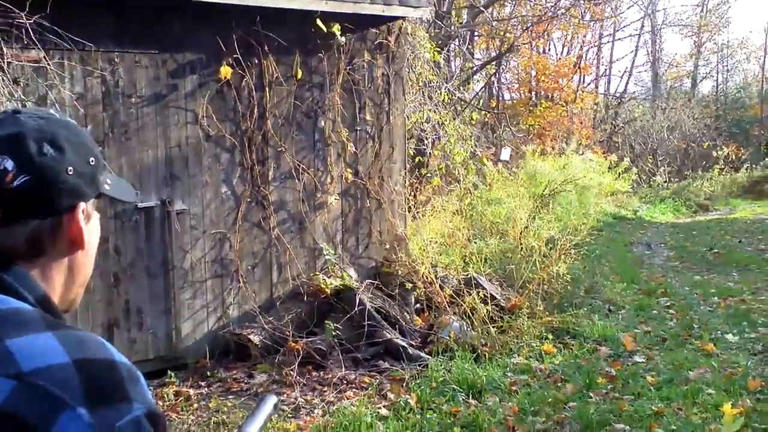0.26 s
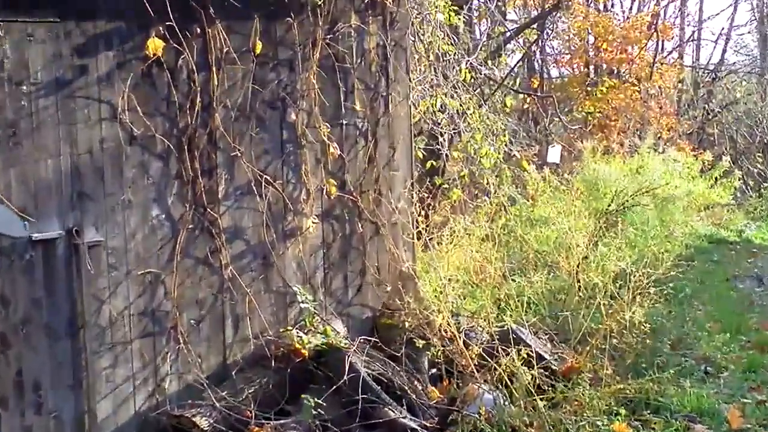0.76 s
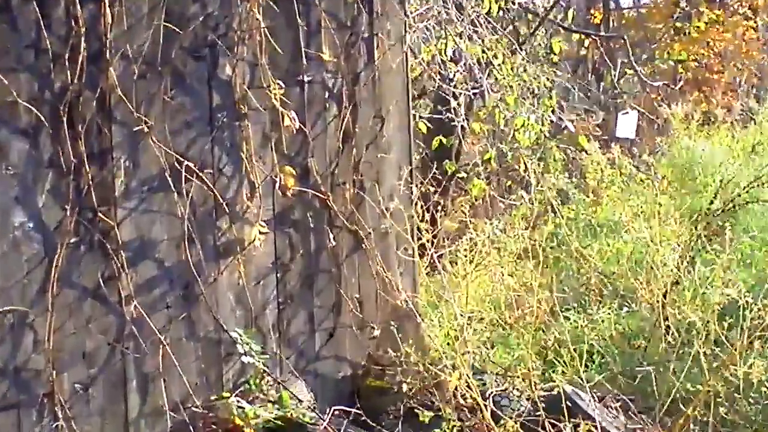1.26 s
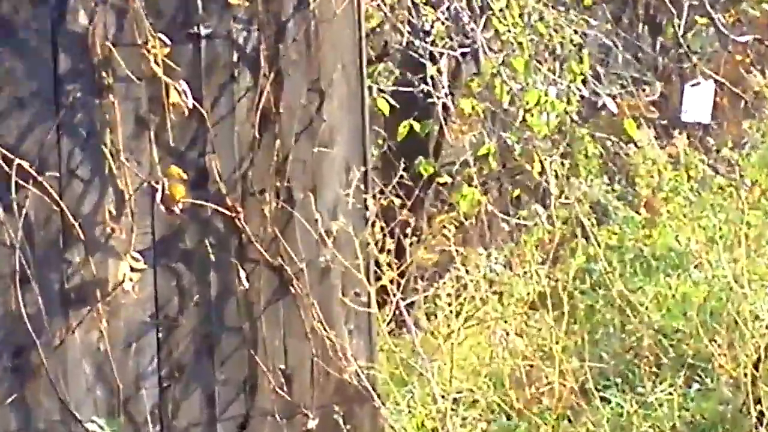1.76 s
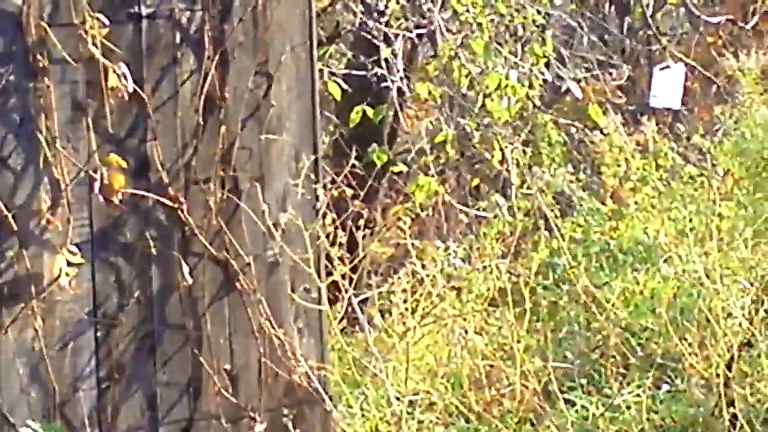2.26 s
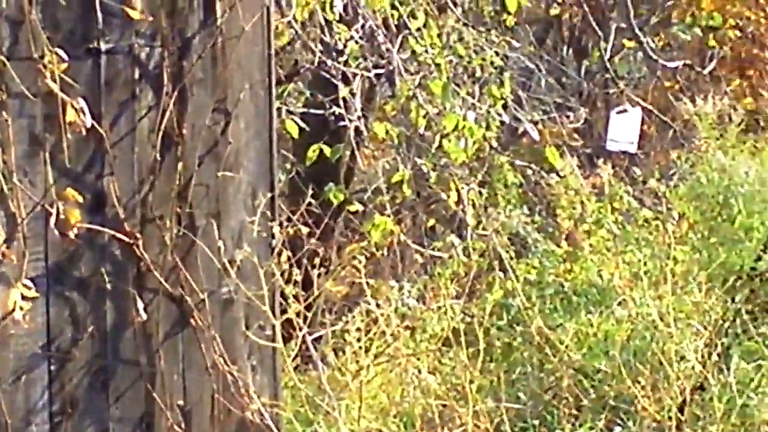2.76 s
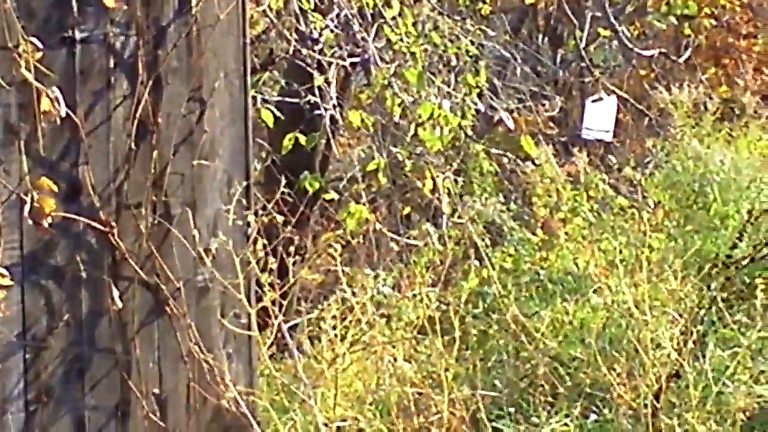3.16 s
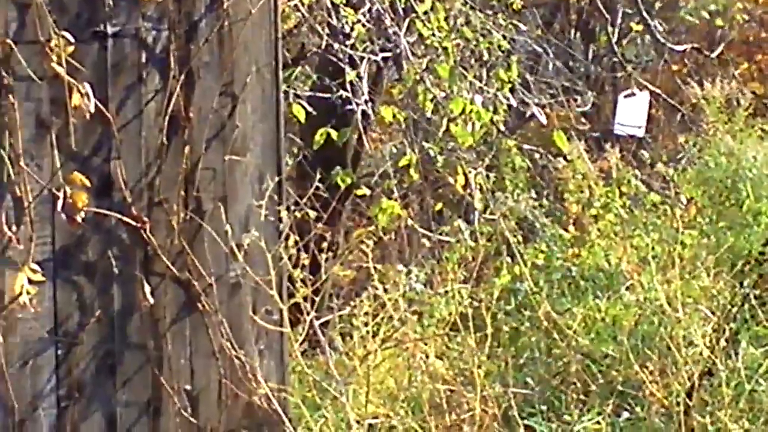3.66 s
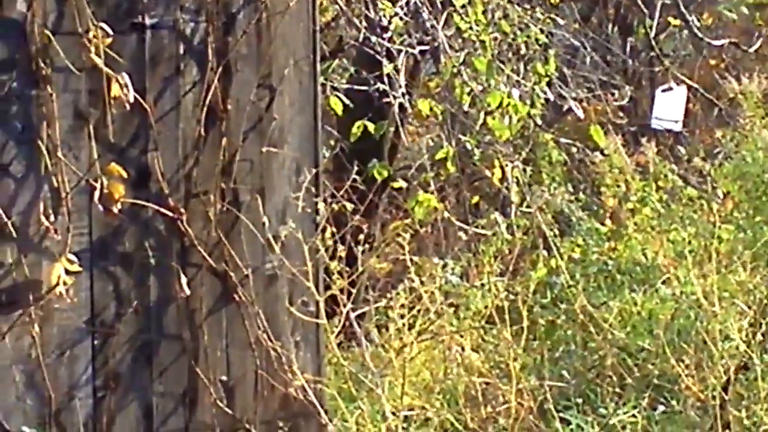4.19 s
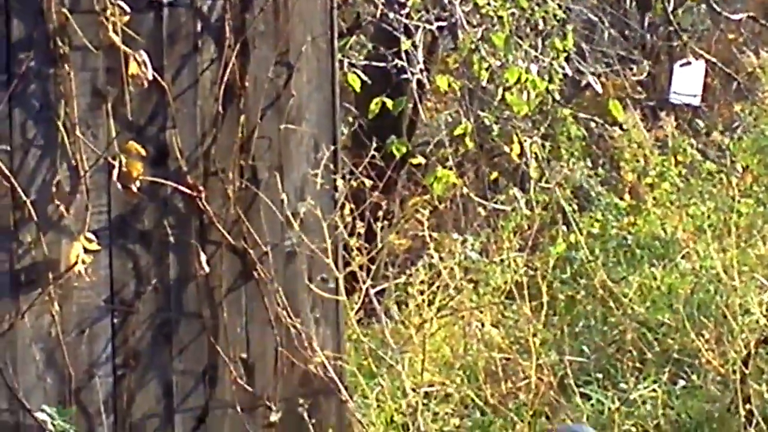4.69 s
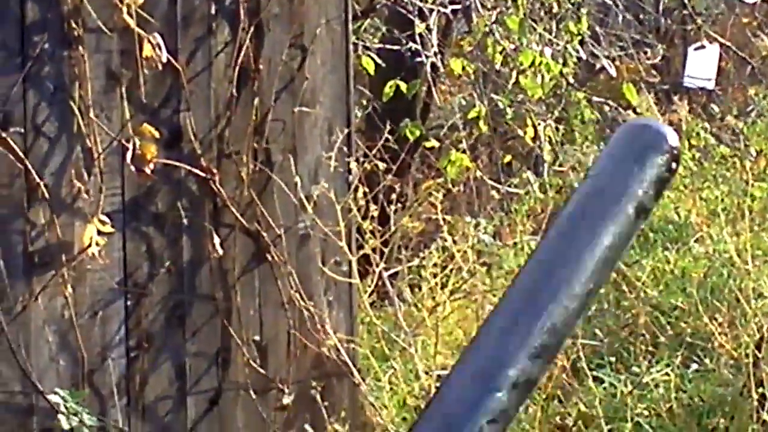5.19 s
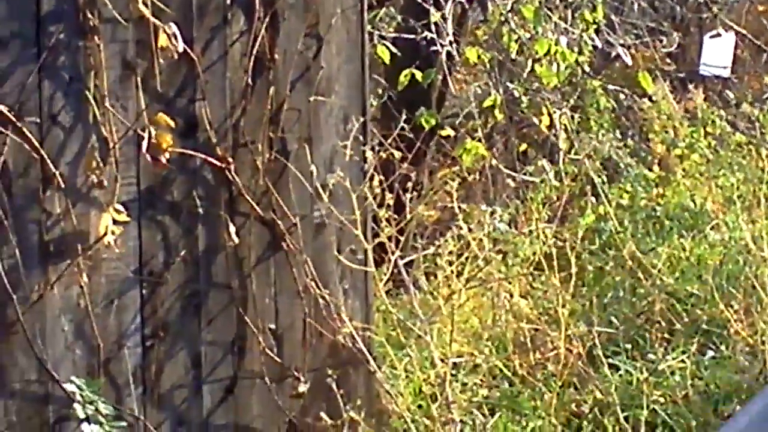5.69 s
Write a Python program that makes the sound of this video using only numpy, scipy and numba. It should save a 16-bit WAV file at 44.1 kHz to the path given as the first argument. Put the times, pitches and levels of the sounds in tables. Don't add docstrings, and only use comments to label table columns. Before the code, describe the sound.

A homemade cannon clicks and fires once beside a wooden shed; the boom returns from the woods, twigs snap, then sleeves rustle and plastic clicks.

```python
import sys
import numpy as np
from scipy import signal
from scipy.fft import rfft, irfft, next_fast_len
from scipy.io import wavfile
from scipy.ndimage import uniform_filter1d
from numba import njit

SR = 44100
rng = np.random.default_rng(int(sys.argv[2]) if len(sys.argv) > 2 else 0)


def invert_db(level):
    return 10 ** (np.asarray(level, dtype=float) / 20)


def generate_wav(signal):
    frames = np.transpose(np.atleast_2d(signal))
    scaled = np.clip(frames, -1, 1) * 32767
    pcm = np.round(scaled).astype(np.int16)
    wavfile.write(sys.argv[1], SR, pcm)


N = 261954
T = np.arange(N) / SR
SHORT = T[:SR // 4]
FAST = next_fast_len(N)
BANDS_HZ = 25 * 2 ** np.arange(0, 9.4, 1 / 3)
PLUG_EXIT_S, SUCK_BACK_S, BURST_S = 3.0608, 3.0604, 3.0638


def unit(x):
    return x / np.sqrt(np.mean(x ** 2))


@njit
def svf(x, hz, width):
    y, b, l = np.empty(len(x)), 0., 0.
    for i in range(len(x)):
        g, k = np.tan(np.pi * hz[i] / SR), width / hz[i]
        v = (b + g * (x[i] - l)) / (1 + g * (g + k))
        b, l, y[i] = 2 * v - b, l + 2 * g * v, k * v
    return y


def band(x, hz, width_hz):
    centre = np.full(len(x), 1. * hz)
    return svf(svf(x, centre, 1. * width_hz), centre, 1. * width_hz)


def dull(x, hz):
    return signal.sosfilt(signal.butter(3, hz, fs=SR, output="sos"), x)


def walk(rate):
    hold = int(SR / rate)
    steps = np.repeat(rng.standard_normal(N // hold + 1), hold)
    return 1.3 * uniform_filter1d(uniform_filter1d(steps, hold), hold)[:N]


def split(x, colour):
    hz, db = np.transpose(colour)
    octave = np.log2(np.maximum(np.fft.rfftfreq(FAST, 1 / SR), 1))
    gain_db = np.interp(octave, np.log2(hz), db, left=-80, right=-80)
    spectrum = rfft(x, FAST) * invert_db(gain_db)
    spectrum = spectrum / np.sqrt(np.mean(irfft(spectrum, FAST) ** 2))
    bands = []
    for centre_hz in BANDS_HZ:
        share = np.maximum(1 - 3 * np.abs(octave - np.log2(centre_hz)), 0)
        bands.append(irfft(spectrum * share, FAST)[:N])
    return bands


def grains(per_s, scatter_db):
    hit, size, sign = rng.random((3, N))
    click = invert_db(-scatter_db * np.log(size + .01)) * np.sign(sign - .5)
    return unit((hit < per_s / SR) * click)


def fade(t60):
    return np.exp(-np.log(1000) * SHORT / max(t60, .003))


def ring(hz, db, t60):
    return invert_db(db) * np.sin(2 * np.pi * hz * SHORT) * fade(t60)


def swell(start_s, hold_s, db, rise_db_per_s, fall_db_per_s):
    before_s = np.maximum(start_s - T, 0)
    after_s = np.maximum(T - start_s - hold_s, 0)
    return invert_db(db - rise_db_per_s * before_s - fall_db_per_s * after_s)


def add(out, at_s, sound):
    i = int(at_s * SR)
    out[i:i + len(sound)] += sound[:N - i]


def rustle(strokes, per_s, scatter_db, width_hz, gain_db, rise_db_per_s, fall_db_per_s, top_hz):
    scratch = dull(band(grains(per_s, scatter_db), 4500, 9000), top_hz)
    out = 0
    for start_s, hold_s, db, hz in strokes:
        body = .5 * scratch + svf(scratch, np.full(N, 1. * hz), 1. * width_hz)
        out = out + unit(body) * swell(start_s, hold_s, db + gain_db, rise_db_per_s, fall_db_per_s)
    return out


def tap(out, at_s, db, low_hz, high_hz, thump_db, t60, crack):
    blow = .14 * rng.standard_normal(len(SHORT)) * fade(t60) + (SHORT == 0)
    snap = band(blow, np.sqrt(low_hz * high_hz), 1.0 * abs(high_hz - low_hz))
    snap = dull(snap + crack * band(blow, 3600, 11000), 9900)
    thump_hz = 488 * (1.75 if low_hz > 2800 else 1)
    thump = ring(thump_hz, db + thump_db, 1.45 * t60)
    add(out, at_s, invert_db(db) * snap / np.abs(snap).max() + thump)


# f/Hz, level/dB
FIELD_COLOUR = [(12, -45), (20, -18.5), (92, -4.5), (140, -3.5), (297, -2.5), (808, -8.5), (904, -8.5),
                (1160, -10), (1620, -11), (2910, -15), (5820, -20), (7910, -26.5), (11400, -28.5),
                (13800, -39), (15400, -27.5)]


def field():
    recovery_s = np.maximum(T - BURST_S - .15, 0)
    duck_db = np.minimum(-14 + 24 * recovery_s, 0.3) * (T > PLUG_EXIT_S)
    bands = split(rng.standard_normal(N), FIELD_COLOUR)
    level_db = -52 + .2 * walk(1.5) + duck_db
    return sum(b * invert_db(level_db + 1.0 * walk(11)) for b in bands)


# start t/s, hold t/s, level/dB, brightness f/Hz
SLEEVE_STROKES = [
    (4.55, 0.11, -59.5, 3280),
    (4.735, 0.048, -51.5, 4500),
    (5.31, .1, -57, 2880),
    (5.85, .09, -66.5, 2950),
]


def sleeves():
    return rustle(SLEEVE_STROKES, per_s=6600, scatter_db=2.0, width_hz=3400, gain_db=3.0,
                  rise_db_per_s=222, fall_db_per_s=500, top_hz=10500)


# start t/s, hold t/s, level/dB, brightness f/Hz
HAND_STROKES = [
    (5.645, 0.047, -51, 2260),
    (5.7, 0.039, -56, 2590),
    (5.75, 0.03, -52, 2460),
    (5.79, 0.023, -62, 3500),
]


def hand_slide():
    return rustle(HAND_STROKES, per_s=3000, scatter_db=2.0, width_hz=900, gain_db=2.5,
                  rise_db_per_s=1200, fall_db_per_s=600, top_hz=7500)


# t/s, peak level/dB, lowest f/Hz, highest f/Hz,
# thump level/dB
HARD_TICKS = [(.24, -27, 2000, 3900, -10), (.2887, -29, 2110, 3680, -25), (.331, -44, 2200, 4000, -6),
              (.385, -22, 1000, 6000, -11), (1.913, -32, 700, 3200, -6), (2.9578, -19, 1930, 5700, -39),
              (3.5858, -18.5, 3000, 8800, -5), (4.049, -35.5, 800.7, 2530, 3), (4.268, -43, 1434, 6000, -3),
              (4.5015, -39.5, 2020, 4480, -5), (4.547, -37.5, 1980, 7000, -11),
              (4.59, -32, 1990, 7500, -11), (5.58, -18.5, 1750, 2750, -24), (5.5803, -27, 4500, 7500, -30),
              (5.886, -30, 2000, 8000, -23), (5.914, -28, 3200, 5200, -25)]
# t/s, peak level/dB, lowest f/Hz, highest f/Hz, thump level/dB
BUTTON_REBOUND = (2.9622, -27, 2400, 6500, -26)


def ticks():
    out = np.zeros(N)
    for row in HARD_TICKS:
        tap(out, *row, t60=.015, crack=.15)
    tap(out, *BUTTON_REBOUND, t60=.06, crack=.02)
    return out


# start t/s, hold t/s, level/dB, brightness f/Hz
LEAF_STROKES = [
    (3.59, .004, -38, 3900),
    (3.622, 0.068, -43, 3450),
    (3.75, 0.065, -54, 3200),
    (3.858, 0.0091, -40, 3250),
    (3.884, 0.0056, -44.5, 4180),
    (3.898, 0.014, -42.5, 3800),
    (3.93, .09, -58, 3200),
]


def leaves():
    return rustle(LEAF_STROKES, per_s=4700, scatter_db=4.5, width_hz=3200, gain_db=-1.8,
                  rise_db_per_s=2200, fall_db_per_s=305, top_hz=7500)


# t/s, peak level/dB, pitch f/Hz
TWIG_SNAPS = [
    (3.629, -23, 3600),
    (3.6555, -32, 6000),
    (3.67, -31, 5600),
    (3.758, -37, 5100),
    (3.769, -36, 5000),
    (3.863, -28, 3880),
    (3.886, -28, 4200),
    (3.907, -24, 3880),
]


def twigs():
    out, spread = np.zeros(N), 1.33
    for at_s, db, hz in TWIG_SNAPS:
        tap(out, at_s, db, hz / spread, hz * spread, thump_db=-19, t60=0.019, crack=.02)
    return out


# t/s, level/dB
ECHO_LEVEL = [(3.07, -28), (3.132, -35), (3.14, -27), (3.3, -21), (3.37, -27.5), (3.55, -37), (3.9, -42.5),
              (4.2, -51), (4.6, -64)]
# f/Hz, level/dB
ECHO_COLOUR = [(24, -48), (70, -4.5), (192, -4), (286, -7.5), (377, -8), (427, -7.5), (521, -3), (836, -6),
               (1100, -2), (1340, -4.5), (3300, -7), (4900, -12), (7120, -23.5), (13000, -57), (15400, -70)]


def woods():
    age_s = np.maximum(T - BURST_S, 0)
    low_db = 13.5 * np.exp(-age_s / 0.14)
    mid_db = -18 * np.maximum(age_s - .55, 0)
    high_db = 3 - 24.5 * age_s
    top_db = np.maximum(16 - 66 * age_s, -18)
    level_db = np.interp(T, *np.transpose(ECHO_LEVEL), left=-120, right=-120) + 2 + 0.34 * walk(25.02)
    corners = np.log([100, 1500, 2800, 5500, 10000])
    out = 0
    for hz, part in zip(BANDS_HZ, split(grains(per_s=5000, scatter_db=2.0), ECHO_COLOUR)):
        low, _, mid, high, top = [np.interp(np.log(hz), corners, row) for row in np.eye(5)]
        tilt_db = low * low_db + mid * mid_db + high * high_db + top * top_db
        out = out + part * invert_db(level_db + tilt_db + 1.03 * walk(15))
    return out


def chamber():
    hum = swell(3.16, 0.1, -36.5, rise_db_per_s=52, fall_db_per_s=47)
    out = hum * (T > BURST_S) * np.sin(2 * np.pi * 50 * (T - BURST_S))
    add(out, SUCK_BACK_S, -ring(hz=72, db=-15.5, t60=0.052))
    return out


def whoop():
    start_s, column_hz = 3.0307, 200
    travel = np.clip((T - start_s) / (PLUG_EXIT_S - start_s), 0, 1)
    hz = column_hz / np.maximum(1 - travel ** 5, .088) * (travel > 0)
    pressure = .13 * travel ** .4 + 2.6 * travel ** 9
    release = np.exp(-np.maximum(T - PLUG_EXIT_S, 0) / .0003)
    return invert_db(-5.5) * pressure * release * np.cos(2 * np.pi * np.cumsum(hz) / SR)


# f/Hz, level/dB
GAS_COLOUR = [(40, -38), (150, 7), (400, 8), (500, -5), (900, -2), (1600, -1), (2200, 1), (3200, -4.5),
              (5500, -4.5), (7500, -13.5), (10000, -19), (15400, -67)]


def muzzle_gas():
    burst = swell(BURST_S, 0, -3.5, rise_db_per_s=1650, fall_db_per_s=6495) * (T > 3.028)
    afterflow = swell(BURST_S, 0, -25, rise_db_per_s=0, fall_db_per_s=347) * (T > BURST_S)
    return sum(split(rng.standard_normal(N), GAS_COLOUR)) * np.maximum(burst, afterflow)


# struck t/s, f/Hz, peak level/dB, decay by 60 dB t/s
BARREL_MODES = [(3.048, 2200, -16.5, 0.023), (3.0562, 5580, -11, 0.033), (3.0628, 3170, -4.5, 0.022),
                (3.056, 192, -6.5, 0.063), (3.059, 1037, -4, 0.035), (3.059, 1563, -11, 0.033),
                (3.062, 625, -14, 0.031), (3.062, 132, -20.5, 0.13), (3.076, 333, -14, 0.047),
                (3.137, 1320, -13, 0.0089), (3.137, 4220, -21.5, 0.0146)]


def blast():
    gas = muzzle_gas()
    ground_lag_s = 0.0019
    out = gas + whoop() + 0.54 * np.roll(gas, int(ground_lag_s * SR))
    add(out, SUCK_BACK_S, -ring(hz=340, db=2, t60=.022))
    for at_s, *mode in BARREL_MODES:
        add(out, at_s, ring(*mode))
    return out


def scene():
    background = field()
    handling = sleeves() + hand_slide() + ticks()
    brush = leaves() + twigs()
    shot = woods() + chamber() + blast()
    return (background + handling + brush + shot)[None]


def low_pass(x):
    return signal.sosfilt(signal.butter(12, 15570, fs=SR, output="sos"), x)


def record(dry):
    x = signal.sosfilt(signal.butter(2, 35, "high", fs=SR, output="sos"), dry[0])
    x = x / (1 + np.abs(x) ** 3) ** (1 / 3)
    port_hz, port_width_hz = 7880., 450.
    x = x - .95 * svf(x, np.full(N, port_hz), port_width_hz)
    return low_pass(x[None])


dry = scene()
out = record(dry)
generate_wav(out)
```